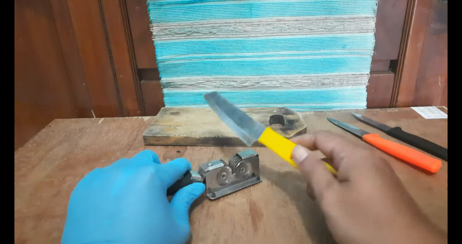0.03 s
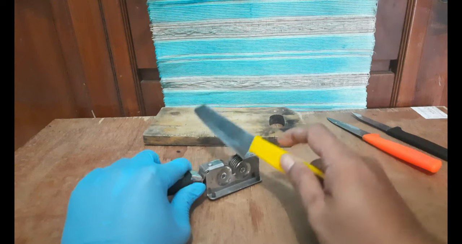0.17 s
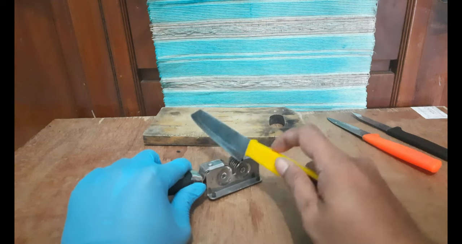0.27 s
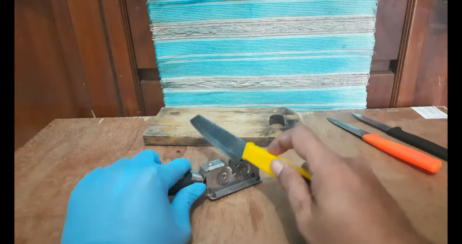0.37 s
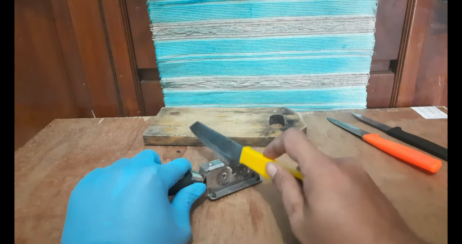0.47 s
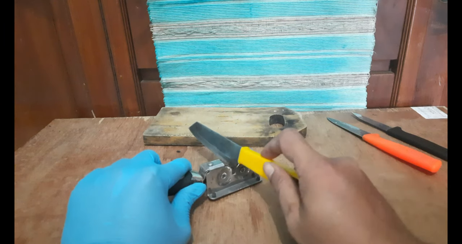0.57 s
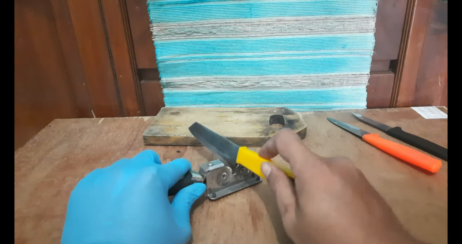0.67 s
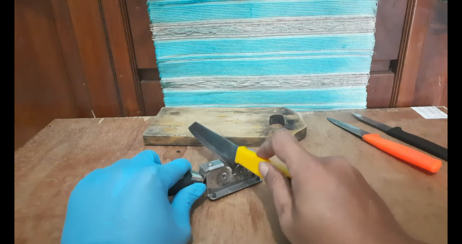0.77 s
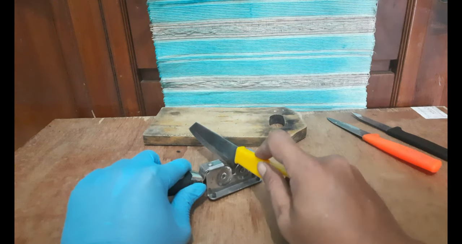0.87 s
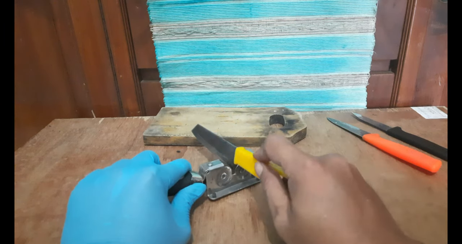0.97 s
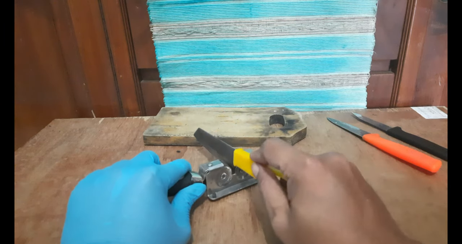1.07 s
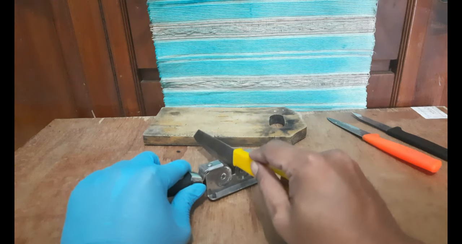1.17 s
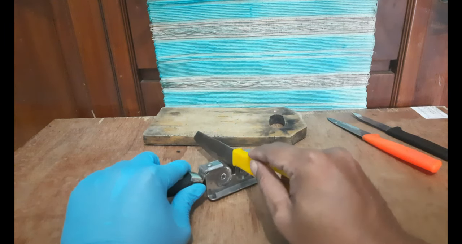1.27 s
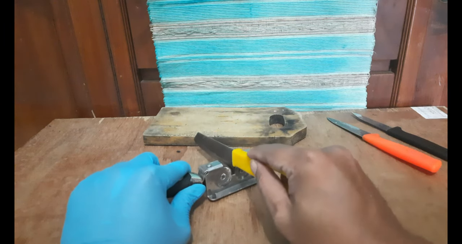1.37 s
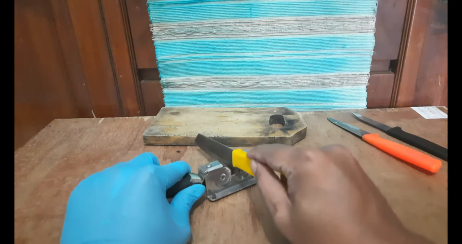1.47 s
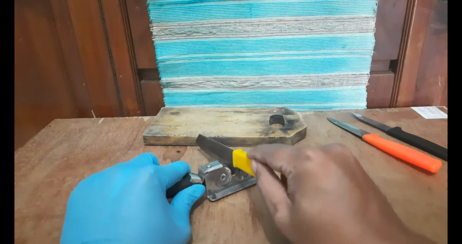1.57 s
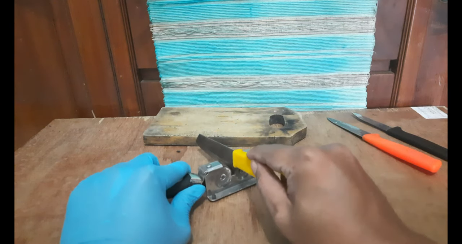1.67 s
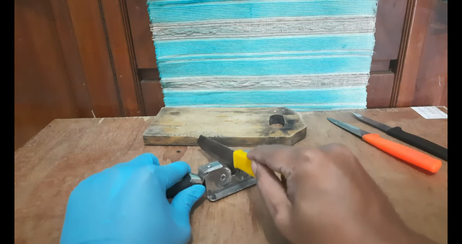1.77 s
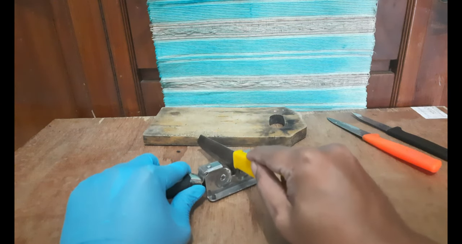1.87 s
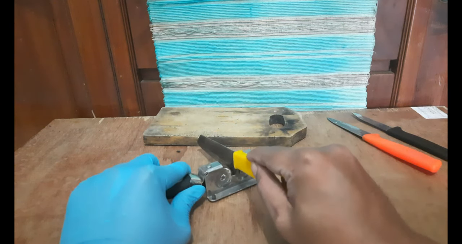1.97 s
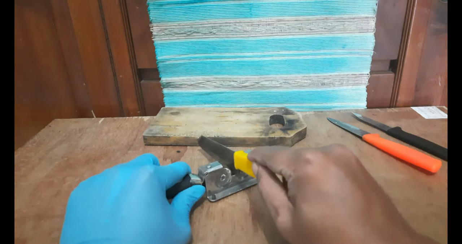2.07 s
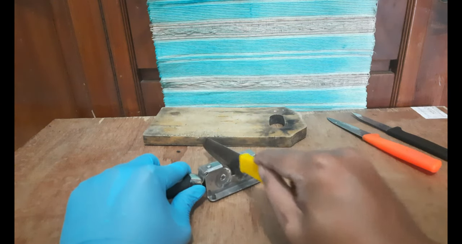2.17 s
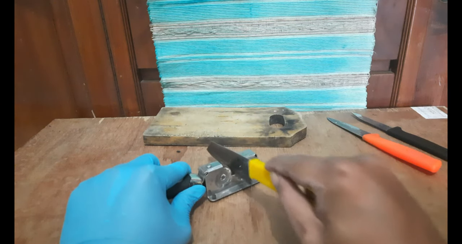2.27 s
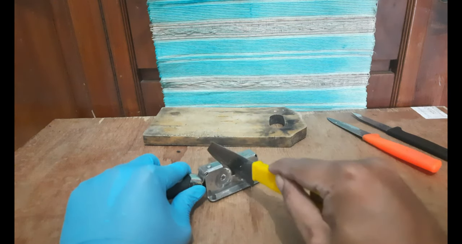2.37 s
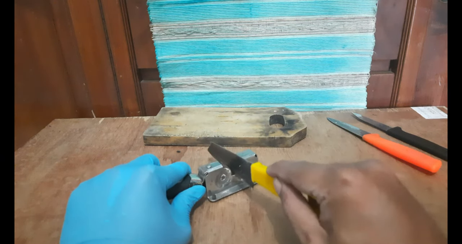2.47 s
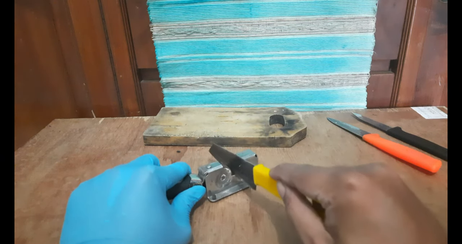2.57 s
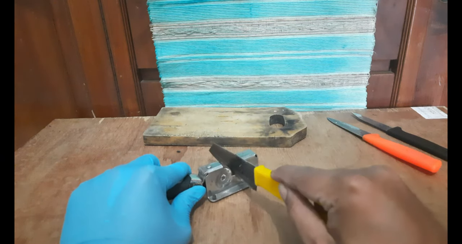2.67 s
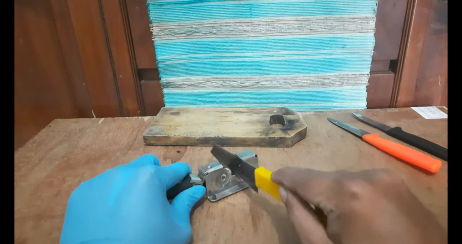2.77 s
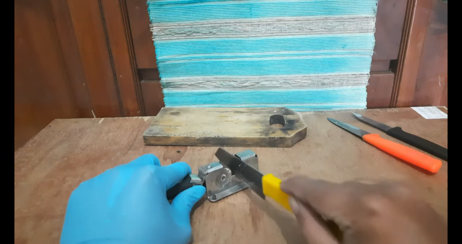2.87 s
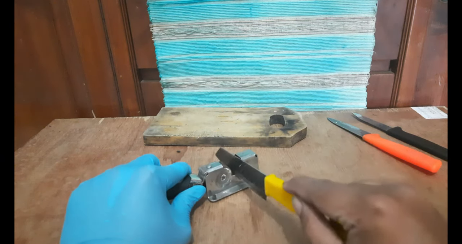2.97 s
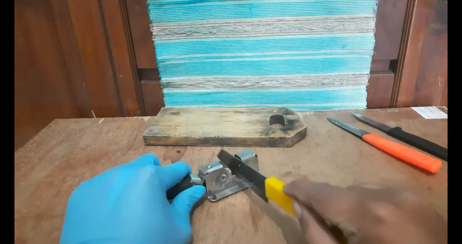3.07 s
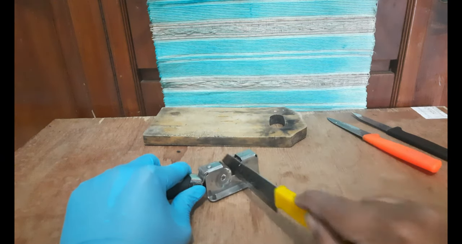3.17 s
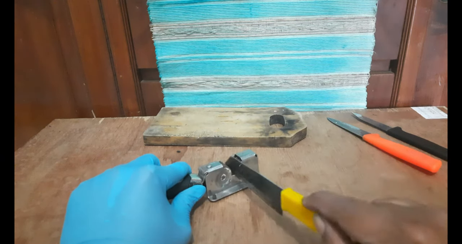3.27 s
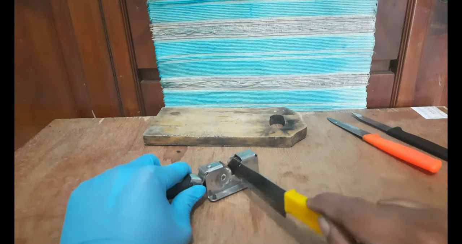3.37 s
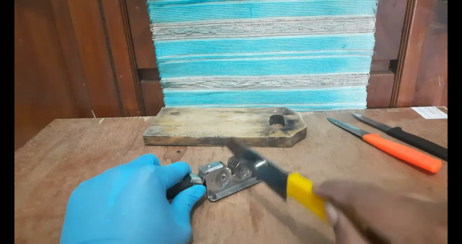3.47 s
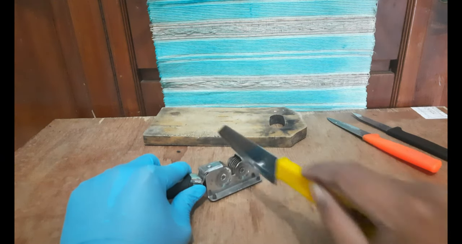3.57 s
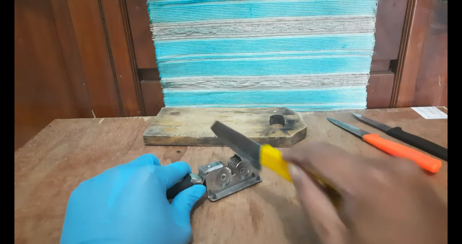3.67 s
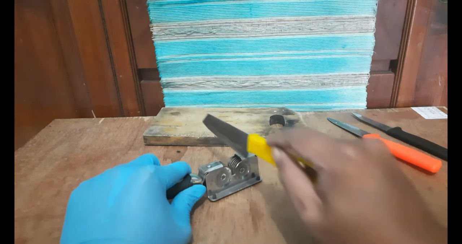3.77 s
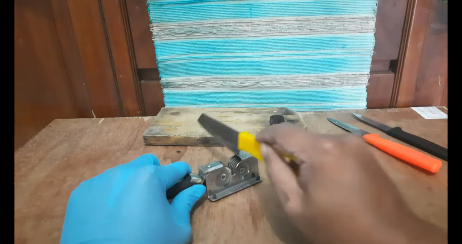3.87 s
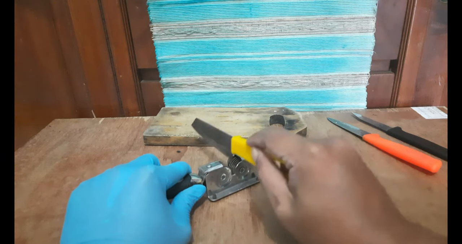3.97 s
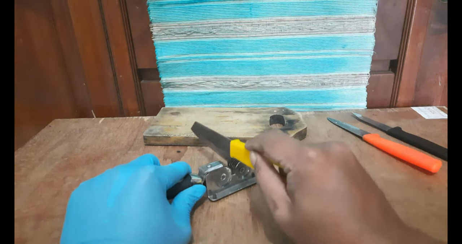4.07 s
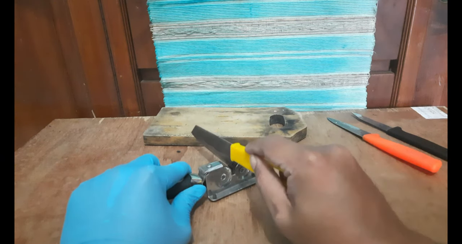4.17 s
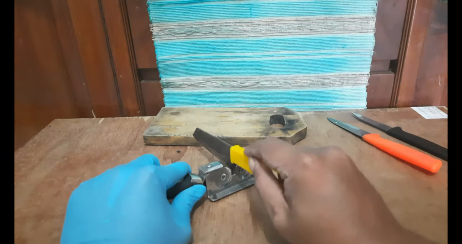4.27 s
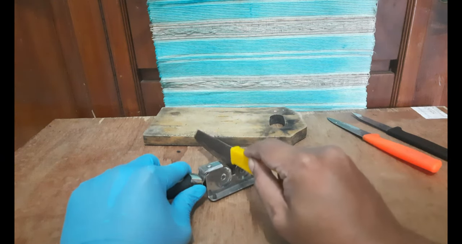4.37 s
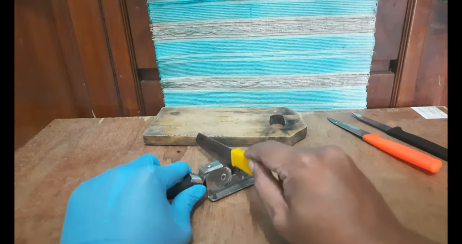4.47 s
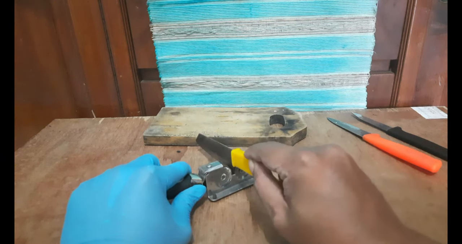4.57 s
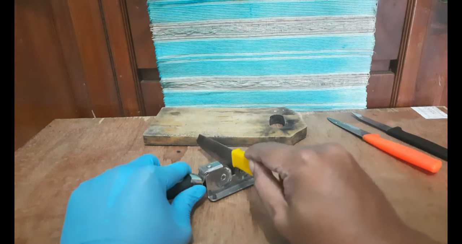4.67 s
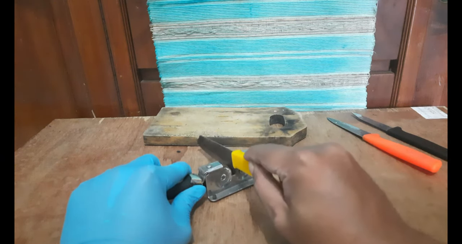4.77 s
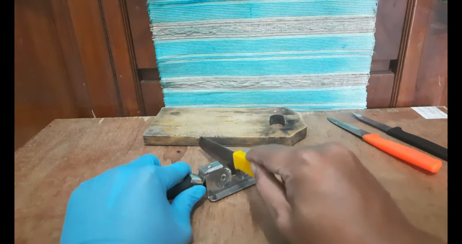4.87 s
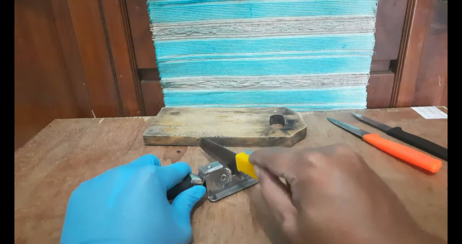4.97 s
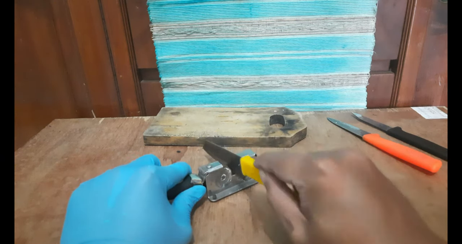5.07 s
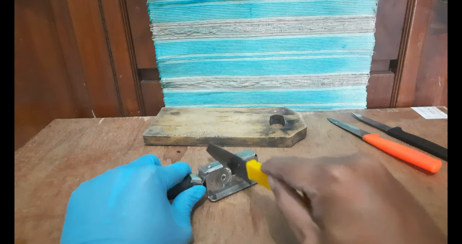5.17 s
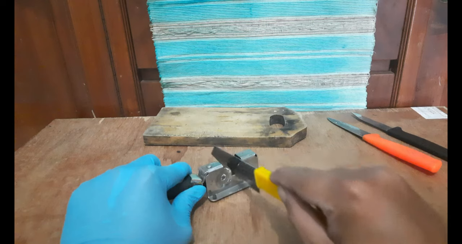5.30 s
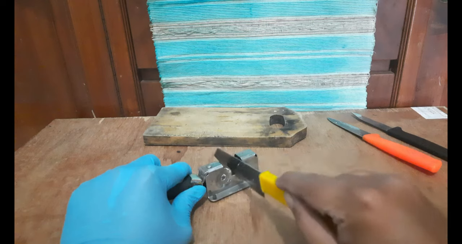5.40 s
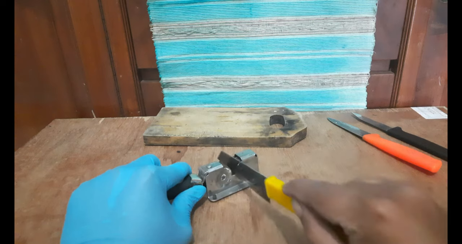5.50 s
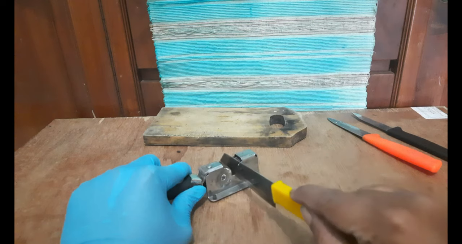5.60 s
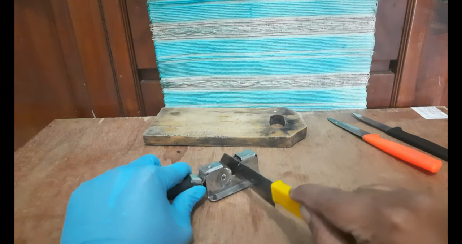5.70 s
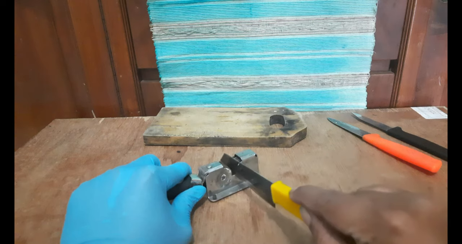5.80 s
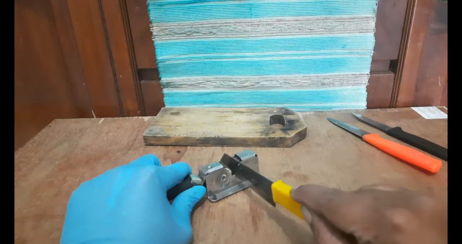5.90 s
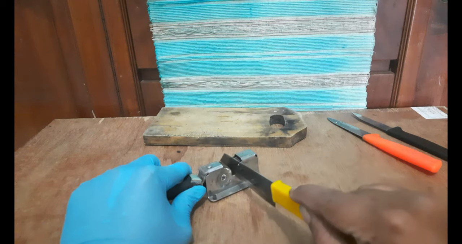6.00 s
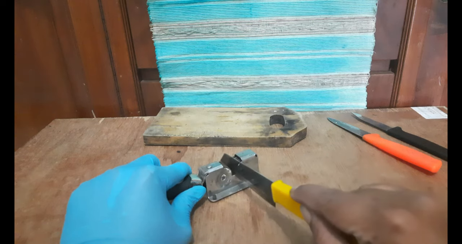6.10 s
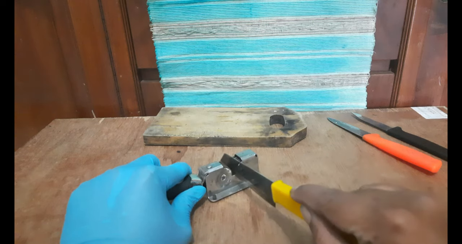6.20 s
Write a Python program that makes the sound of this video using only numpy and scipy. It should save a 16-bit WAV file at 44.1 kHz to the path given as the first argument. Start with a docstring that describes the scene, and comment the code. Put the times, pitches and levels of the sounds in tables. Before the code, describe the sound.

A kitchen knife drags through a small metal wheel sharpener on a wooden table, gritty scrapes, clicks and low thuds in two uneven passes.

```python
"""At a wooden table in a small hard room, a kitchen knife is dragged through a steel wheel sharpener.
Stick-slip friction and sharp catches excite three bodies: the table booms, the sharpener frame buzzes
and the blade hisses and clicks. Each body is a set of resonances driven by random force and short blows.
Decaying noise gives the room's answer; shaped noise gives a quiet floor with a thin high whine."""
import sys
import numpy as np
from scipy import signal
from scipy.fft import rfft, irfft, next_fast_len
from scipy.io import wavfile
from scipy.ndimage import map_coordinates

SR = 44100
rng = np.random.default_rng(int(sys.argv[2]) if len(sys.argv) > 2 else 0)


def pcm_store(signal):
    """Save signal as 16-bit PCM."""
    levels = np.round(np.clip(np.atleast_2d(signal), -1, 1) * 32767)
    wavfile.write(sys.argv[1], SR, levels.astype(np.int16).T)


def how_loud(loudness_db):
    """Turn decibels into a plain amplitude multiplier (0 dB gives 1, 20 dB gives 10)."""
    steps = np.asarray(loudness_db, float) / 20
    return 10 ** steps


N = 275184

# share of each left-right difference given to the (left, right) port [signed fraction]
EAR = np.array([[.5], [-.5]])


def unit(x):
    """Normalisation: a signal scaled to rms 1."""
    return x / np.sqrt(np.mean(x ** 2) + 1e-20)


def along(points, hz):
    """Logarithmic frequency scale: (frequency [Hz], value) points joined along it."""
    f, v = np.transpose(points)
    return np.interp(np.log(hz + 1), np.log(f + 1), v)


def filtered(x, response):
    """Linear filtering: the spectrum of x times a complex response of frequency."""
    m = next_fast_len(N + SR // 2)
    spectrum = rfft(x, m) * response(np.fft.rfftfreq(m, 1 / SR))
    return irfft(spectrum, m)[..., :N]


def wobble(rate):
    """Slow random modulation: a smooth curve through rate random knots a second."""
    coarse = np.arange(0, N + 32, 32)
    knots = rng.standard_normal(int(N * rate / SR) + 4)
    return np.interp(np.arange(N), coarse, map_coordinates(knots, [coarse * rate / SR]))


def paired(pair, alike):
    """Interchannel coherence: unrelated signals mixed into left and right of a given likeness."""
    def turn(hz):
        return np.arccos(np.clip(along(alike, hz), -1, 1)) / 2
    mid, side = filtered(pair, lambda hz: np.array([np.cos(turn(hz)), np.sin(turn(hz))]))
    return np.array([mid + side, mid - side])


def floor():
    """Stationary noise: partly coherent room air, heavier on the left, and a narrow unsteady whine."""
    # air spectrum: (frequency [Hz], relative density [dB per Hz])
    air_spectrum = [(15, -60), (25, -29), (64, -4), (125, -6), (200, -12), (290, -5), (545, -20),
                    (700, -21), (1400, -25), (2500, -34), (4000, -40), (6500, -43), (8600, -37),
                    (13000, -39), (16000, -40)]
    # coherence of the air: (frequency [Hz], left-right likeness [0 to 1])
    air_alike = [(60, 0.29), (300, 0), (1400, 1), (7000, 1)]
    # balance of the air: (frequency [Hz], left above right [dB])
    air_lean = [(60, 13), (300, 1.5), (1200, 8), (8000, 3.5)]
    # narrow noise band: (centre [Hz], width [Hz], mean level [dB])
    whine_band = (8800, 170, -91)
    air_db = -68.5
    noise = filtered(rng.standard_normal((2, N)), lambda hz: how_loud(along(air_spectrum, hz)))
    air = unit(paired(noise, air_alike))
    air = filtered(air, lambda hz: how_loud(EAR * along(air_lean, hz)))
    centre, width, whine_db = whine_band
    whine = filtered(rng.standard_normal((2, N)), lambda hz: np.exp(-((hz - centre) / width) ** 2))
    return how_loud(air_db + 0.6 * wobble(9)) * air + how_loud(whine_db + 2 * wobble(2)) * unit(whine)


def add_stroke(gain, s, db, fall_db_per_s):
    """Attack and release: a stroke bites quickly, follows its points and falls away after the last."""
    bite_s, bite_db, gone_db = 0.013, 38, 70  # bite time; depths below the stroke at its two ends
    times = np.concatenate([[s[0] - bite_s], s, [s[-1] + gone_db / fall_db_per_s]])
    levels = np.concatenate([[db[0] - bite_db], db, [db[-1] - gone_db]])
    span = np.arange(int(times[0] * SR), min(N, int(times[-1] * SR)))
    gain[span] += how_loud(np.interp(span / SR, times, levels))


def pressure():
    """Contact force: gains of table boom, frame buzz and edge hiss, summed over all strokes."""
    # short drags of the blade in the wheels, and small shifts and shakes heard mostly in the table:
    # (start [s], length [s], frame buzz at start [relative dB], frame buzz at end [relative dB],
    # table boom above buzz [dB])
    drags_and_shifts = [(1.023, 0.052, -82, -66.5, 16), (1.104, 0.25, -66, -81, 4),
                        (1.354, 0.12, -77.5, -78.5, 22.5), (1.468, .035, -65, -76, 0),
                        (1.516, 0.011, -53.5, -54.5, 13), (1.545, 0.022, -51, -71.5, 23),
                        (1.676, 0.032, -88, -93, 37), (1.755, 0.05, -70.5, -67, 18),
                        (1.807, 0.073, -61.5, -71, 26.5), (2.004, 0.1, -58.5, -65.5, 24),
                        (2.1, 0.024, -64, -47, 19), (2.125, 0.21, -43, -44, 6.5),
                        (2.514, 0.074, -53, -54.5, 15), (2.603, 0.02, -47.5, -48.5, 6.5),
                        (2.779, 0.11, -48.5, -40, 6.5), (2.908, 0.06, -39, -63.5, 8.5),
                        (3.075, 0.11, -52, -43.5, 7.5), (3.215, .09, -45, -60, 10),
                        (3.318, 0.087, -77, -59.5, 12.5), (4.201, 0.11, -86.5, -71.5, 17),
                        (4.458, 0.033, -79, -83.5, 24), (4.63, 0.079, -90, -92, 17.5),
                        (4.762, 0.14, -69, -70, 23), (5.866, 0.13, -63.5, -77, 10),
                        (6.028, 0.021, -76, -83.5, 19)]
    # the long slow pull: (time [s], frame buzz, table boom, edge hiss [each relative dB])
    pull = [(4.895, -67, -39, -96), (4.905, -54, -37, -82.5), (4.96, -62, -36, -79.5),
            (5.03, -48, -34.5, -70.5), (5.19, -42.5, -34.5, -68.5), (5.35, -46, -34.5, -66.5),
            (5.42, -50, -39.5, -73), (5.6, -46.5, -39, -72), (5.628, -54, -45.5, -73.5)]
    rest_db, hiss_above_buzz_db = -75.5, -21  # the gripping hand keeps the table faintly stirring
    lift_db_per_s, settle_db_per_s = 775, 206.5  # the edge lifts off fast, the table settles slower
    load, buzz, hiss = np.full(N, how_loud(rest_db)), np.zeros(N), np.zeros(N)
    strokes = [np.transpose(pull)]
    for start, length, first_db, last_db, over_db in drags_and_shifts:
        db = np.array([first_db, last_db])
        strokes.append((np.array([start, start + length]), db, db + over_db, db + hiss_above_buzz_db))
    for s, buzz_db, boom_db, hiss_db in strokes:
        add_stroke(load, s, boom_db, settle_db_per_s)
        add_stroke(buzz, s, buzz_db, lift_db_per_s)
        add_stroke(hiss, s, hiss_db, lift_db_per_s)
    return load, buzz, hiss


def contacts():
    """Impact strengths: all blows as columns of time, frame, table and blade dB, push length in ms."""
    # catches of the blade: (time [s], frame blow [relative dB], table thud above it [dB],
    # blade click above it [dB], push length [ms])
    catches = [(1.07, -46.5, -7, -12, 1.3), (1.482, -46, 6, -35, 1.35), (1.519, -32.5, -7, -38, 2.3),
               (1.556, -50, 18, -17.5, 3.5), (1.674, -52.5, 19, -38.5, 1.8), (1.771, -34, 16.5, -41, 3.76),
               (1.805, -26.5, 11, -21.5, 1.2), (1.822, -37.5, 27, -28, 2.86),
               (1.894, -37.5, 14.5, -42, 2.1), (2.003, -33.5, 20.5, -24.5, 1), (2.092, -28.5, -1, -37, 2.2),
               (2.124, -30, 13, -30, 1.4), (2.299, -25, 11, -27.5, 1.63), (2.516, -37, 7.5, -46, 0.5),
               (2.569, -32, 21, -30, 1.5), (2.607, -26.5, 2.5, -45, 0.71), (2.784, -38, 19.5, -32, 0.77),
               (2.9, -32.5, 5.5, -21, 2.8), (3.204, -26, 14, -12, 1.1), (3.397, -38, 15, -36, 2),
               (3.418, -49.5, -6, -20, 1), (4.768, -33, 8.5, -41.5, 1.2), (4.901, -37.5, 7, -42, 1.7),
               (5.131, -36.5, 15, -40, 0.66), (5.188, -30.5, 5.5, -30, 2.2), (5.369, -33.5, -2, -33, 1),
               (5.622, -32.5, -22, -26, 0.95), (5.854, -41.5, 5.5, -49, 0.82), (6.021, -47.5, 2, -40.5, 1)]
    # dull bumps of the sharpener's foot on the table: (time [s], thud [relative dB])
    bumps = [(0.537, -44), (1.36, -46), (1.754, -27.5), (2.26, -15.5), (2.479, -40), (4.212, -46),
             (4.47, -40.5), (4.684, -42), (4.989, -18.5), (5.272, -21), (6.103, -43.5)]
    # light ticks of the blade alone: (time [s], click [relative dB])
    ticks = [(1.43, -86), (3.11, -67), (3.439, -69), (3.475, -73.5), (4.117, -81)]
    bump_ms, bump_frame_db = 1.46, -21  # push length; what the frame takes of a bump
    rows = [(s, db, db + thud, db + click, ms) for s, db, thud, click, ms in catches]
    rows += [(s, db + bump_frame_db, db, -120, bump_ms) for s, db in bumps]
    rows += [(s, -120, -120, db, bump_ms) for s, db in ticks]
    return np.transpose(rows)


def grit(rate, spread_db, smooth):
    """Stick-slip friction: random slips of uneven size over a smooth rubbing noise."""
    slips = (rng.random(N) < rate / SR) * rng.standard_normal(N)
    slips = slips * how_loud(spread_db * rng.standard_normal(N))
    return unit(unit(slips) + smooth * rng.standard_normal(N))


def pushes(db):
    """Impulse and contact time: each blow is a downward half-sine push; a longer one sounds deeper."""
    force, t_ms = np.zeros(N + SR), np.arange(SR // 100) / SR * 1000
    s, *_, lengths = contacts()
    for start, level, ms in zip(s, db, lengths):
        push = np.sin(np.pi * np.clip(t_ms / ms, 0, 1))
        force[round(start * SR):][:len(push)] -= how_loud(level) * push / push.sum()
    return force[:N]


def blows(db, length):
    """Impact noise: a burst of force for each blow, dying by 60 dB in length seconds."""
    force, t = np.zeros(N + SR), np.arange(SR // 4) / SR
    for s, level in zip(contacts()[0], db):
        burst = rng.standard_normal(len(t)) * how_loud(-60 * t / length)
        force[round(s * SR):][:len(t)] += how_loud(level) * burst / np.linalg.norm(burst)
    return force[:N]


def shaken(force, modes, wander_db, soft_hz):
    """Modal superposition: resonances wander in strength as the contact moves; soft_hz dulls the force."""
    m = next_fast_len(N + SR // 2)
    f = np.fft.rfftfreq(m, 1 / SR)
    soft = 1 / (1 + 1j * f / soft_hz) ** 2
    total, response = 0, 0
    for k, (centre, width, db) in enumerate(modes):
        resonance = 1j * f * width / (centre ** 2 - f ** 2 + 1j * f * width)
        mode = (-1) ** k * soft * how_loud(db) * resonance  # neighbours alternate in sign
        total = total + mode * rfft(force * how_loud(wander_db * wobble(9)), m)
        response = response + mode
    return irfft(total, m)[:N] / np.sqrt(np.mean(np.abs(response) ** 2))


def table_boom(load):
    """Low-frequency modes: rough contact and pushes shake the wooden table."""
    # table resonances: (frequency [Hz], width [Hz], relative level [dB])
    table_modes = [(41.7, 62, -43), (70.2, 29, -23), (134.3, 13.6, -7), (192.8, 19, -3), (219.7, 38.6, -1),
                   (299.7, 38.5, 1.5), (369.4, 21.3, -8), (425, 26, -5), (518, 69, -6), (570.3, 112, -12.5)]
    thud_db = contacts()[2]
    force = load * grit(400, spread_db=1.5, smooth=1.19) + pushes(thud_db + 15.5)
    return shaken(force, table_modes, wander_db=3.0, soft_hz=1050)


def frame_buzz(buzz):
    """Middle-frequency modes: grinding and blows shake the sharpener frame."""
    # frame resonances: (frequency [Hz], width [Hz], relative level [dB])
    frame_modes = [(687.5, 57, -5.5), (861, 69, -3.5), (929.5, 50, -3.5), (1268, 49, 4), (1402, 87, -3.5),
                   (1692, 152, 1), (2249, 82, -3.5), (2446, 117, -0.5), (2940, 440, -19)]
    _, frame_db, _, click_db, _ = contacts()
    # a catch with little click strikes the modes weakly and leaves mostly a blunt knock
    sharp_db = np.clip(0.59 * (click_db - frame_db + 19.5), -15, 0)
    force = buzz * grit(900, spread_db=5.5, smooth=1.0)
    force = force + blows(frame_db + sharp_db + 16.5, length=0.042)

    def knock_band(hz):
        return (1j * hz / (650 + 1j * hz)) ** 2 / (1 + 1j * hz / 1900) ** 4
    force = force + filtered(blows(frame_db + 25.0, length=0.033), knock_band)
    return shaken(force, frame_modes, wander_db=1.76, soft_hz=3780)


def blade_hiss(hiss):
    """High-frequency modes and direct radiation: the steel hisses, clicks and chatters on."""
    # blade resonances: (frequency [Hz], width [Hz], relative level [dB])
    blade_modes = [(4420, 330, -33), (4830, 510, 0.5), (6310, 480, -5.5), (9100, 760, -1.5),
                   (10010, 880, -2), (10840, 850, -6.5), (14000, 200, -7)]
    # sound straight off the edge: (frequency [Hz], relative response [dB])
    rasp_spectrum = [(1500, 3.5), (2800, 10), (4000, 10.5), (6000, 6), (7500, 0.5), (10000, 0),
                     (13000, -3.5), (16000, -8)]
    splash_db, splash_s = 5.5, 0.23  # chatter after a click: level offset, time to lose 60 dB
    click_db = contacts()[3]
    blade = hiss * grit(3000, spread_db=6, smooth=1.6) + blows(click_db + 23, length=0.0067)
    blade = blade + blows(click_db + splash_db, length=splash_s)
    edge = hiss * grit(4700, spread_db=4.5, smooth=1.5) + blows(click_db + 21.5, length=0.042)
    edge = edge + blows(click_db + splash_db, length=splash_s)
    rasp = how_loud(9.0) * filtered(edge, lambda hz: how_loud(along(rasp_spectrum, hz)))
    return how_loud(6.5) * shaken(blade, blade_modes, wander_db=3.5, soft_hz=30000) + rasp


def rings():
    """Free damped vibration: where it is not gripped, the blade rings briefly and unsteadily."""
    # partials of the free blade: (frequency [Hz], level above the blow [dB], time to lose 60 dB [s])
    partials = [(3950, -15, 0.42), (4700, -12, 0.12), (5140, -2.5, 0.11), (5010, 9.5, 0.063),
                (8820, -4.5, 0.12), (12160, -16, 0.1)]
    # blows that leave the blade free to ring: (time [s], relative level [dB])
    ringing_blows = [(1.069, -51), (1.804, -57)]
    ring, t = np.zeros(N), np.arange(SR // 2) / SR
    for s, db in ringing_blows:
        for hz, level, t60 in partials:
            flutter_db = 5 * map_coordinates(rng.standard_normal(140), [t * 250])
            tone = how_loud(db + level - 60 * t / t60 + flutter_db) * np.sin(2 * np.pi * hz * t)
            ring[round(s * SR):][:len(t)] += tone
    return ring


def sharpener(load, buzz, hiss):
    """Common excitation: one judder is shared by table, frame and blade."""
    judder, stutter = wobble(45), wobble(21.89)
    boom = table_boom(load * how_loud(1.8 * judder + 0.6 * stutter))
    buzzing = frame_buzz(buzz * how_loud(1.1 * judder + 0.4 * stutter))
    steel = blade_hiss(hiss * how_loud(1.4 * judder + 0.8 * stutter)) + rings()
    return boom + buzzing + steel


def room(x):
    """Reverberation: the walls' answer is a noise tail in which each frequency decays at its own speed."""
    # reverberation time: (frequency [Hz], time to lose 60 dB [s])
    decay = [(150, 0.18), (1000, 0.25), (4000, 0.28), (12000, 0.4)]
    # strength of the room's answer: (frequency [Hz], response [dB])
    wet_response = [(60, 11.5), (150, -17.5), (500, -8.5), (2000, 0), (10000, -10)]
    # coherence of the tail: (frequency [Hz], left-right likeness [0 to 1])
    tail_alike = [(60, .1), (120, .94), (350, .96), (900, .2), (3000, 0)]
    hop, delay = SR // 4, 250  # samples
    wet, fade = np.zeros((2, N + 2 * SR)), np.hanning(2 * hop)
    padded = np.pad(x, (hop, 2 * hop))
    # each overlapping piece of sound gets a fresh noise tail
    for start in range(0, N + hop, hop):
        hz, t, z = signal.stft(rng.standard_normal((2, SR // 2)), SR, nperseg=256)
        fall_db = -60 * t / along(decay, hz)[:, None]
        tail = signal.istft(z * how_loud(fall_db), SR, nperseg=256)[1]
        piece = padded[start:start + 2 * hop] * np.sqrt(fade)
        echo = signal.fftconvolve(piece[None], tail / np.linalg.norm(tail[0]), axes=1)
        wet[:, start:start + echo.shape[1]] += echo
    late = wet[:, hop - delay:][:, :N]
    return paired(filtered(late, lambda f: how_loud(along(wet_response, f))), tail_alike)


def at_ports(dry):
    """Interchannel phase and level: direct sound reaches the two ports with different phase and strength."""
    # phase by which the left leads, reduced below 700 Hz: (frequency [Hz], phase [rad])
    lead_phase = [(700, 1.33), (950, 1.2), (1460, 0.98), (2300, 0.3), (4050, 4.18), (4390, 1), (5250, 5.3),
                  (6460, 4.37), (10200, 4.26), (13500, 11.4), (16000, 6.2)]
    # balance of the direct sound: (frequency [Hz], left above right [dB])
    direct_lean = [(60, 7), (180, 2), (550, -1), (1650, 3), (4970, 2.5), (15000, 13.5)]

    def port_response(hz):
        lead = along(lead_phase, hz) * np.clip(hz / 700, 0, 1) ** 2
        return how_loud(EAR * along(direct_lean, hz)) * np.exp(1j * EAR * lead)
    return filtered(dry, port_response)


def scene():
    """Superposition: direct sound, room and floor; the lightest loads lean to the holding hand, left."""
    load, buzz, hiss = pressure()
    dry = sharpener(load, buzz, hiss)
    hand_db = np.clip(-0.6 * (20 * np.log10(load) + 59), 0, 8)  # left above right
    return (at_ports(dry) + room(dry)) * how_loud(EAR * hand_db) + floor()


def top_cut(x):
    """Nothing passes above the cut-off."""
    return signal.sosfilt(signal.butter(12, 16810, fs=SR, output="sos"), x)


def record(dry):
    """Band limitation: the microphone path falls off steeply at the top."""
    def top_fall(hz):
        return how_loud(np.interp(hz, [15750, 15900, 16800, 16900], [0, -22, -30, -90]))
    mix = filtered(dry, top_fall)
    return top_cut(mix)


dry = scene()
out = record(dry)
pcm_store(out)
```